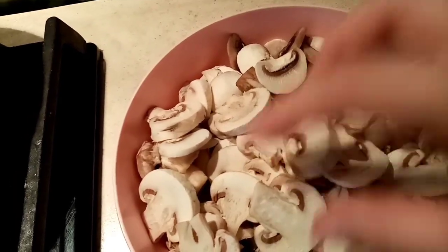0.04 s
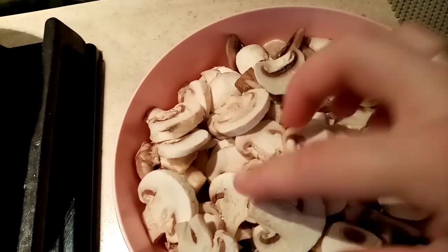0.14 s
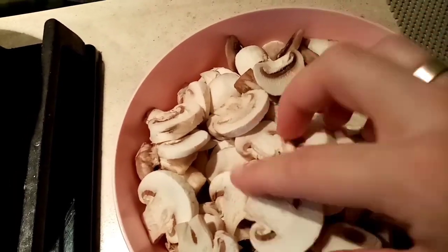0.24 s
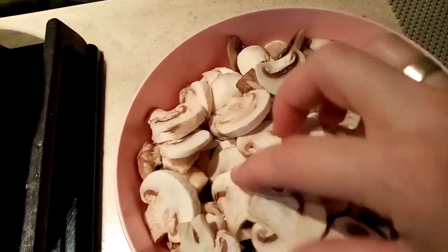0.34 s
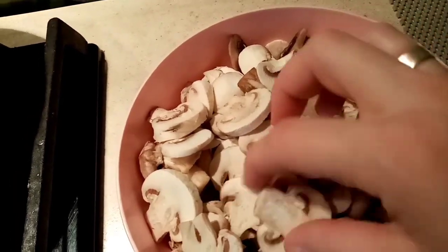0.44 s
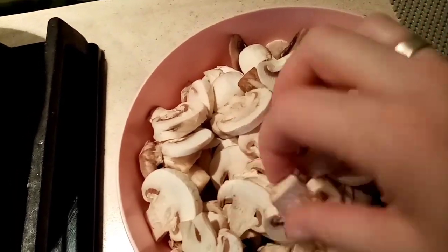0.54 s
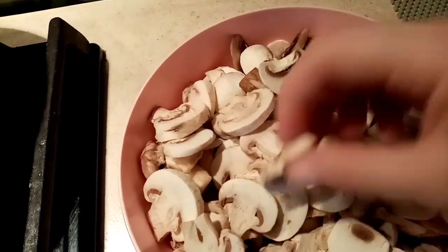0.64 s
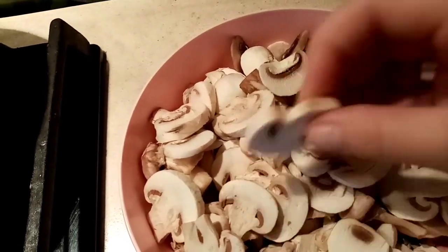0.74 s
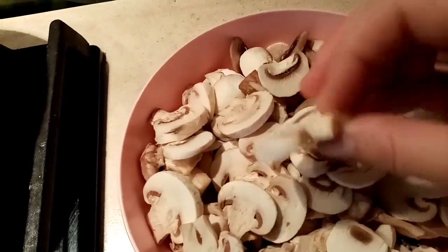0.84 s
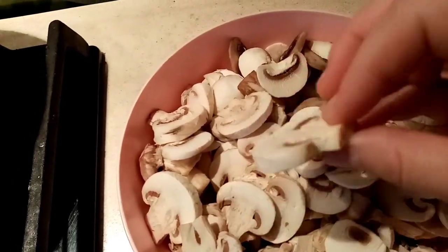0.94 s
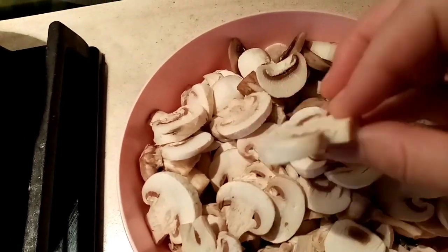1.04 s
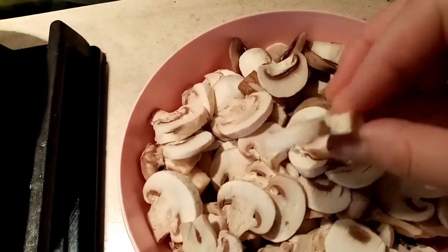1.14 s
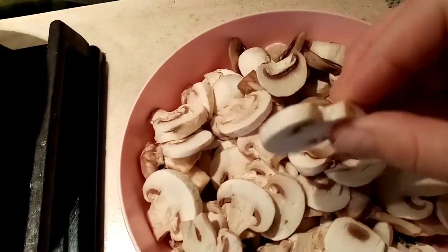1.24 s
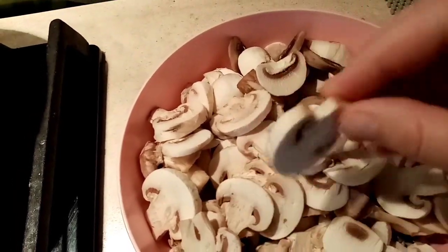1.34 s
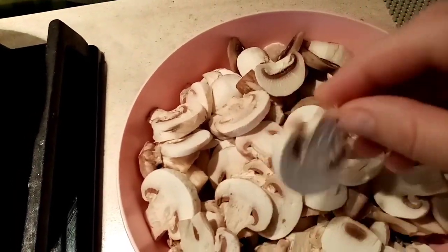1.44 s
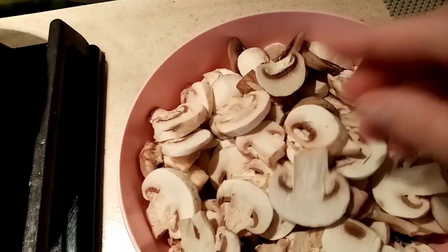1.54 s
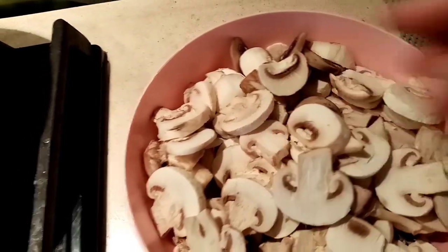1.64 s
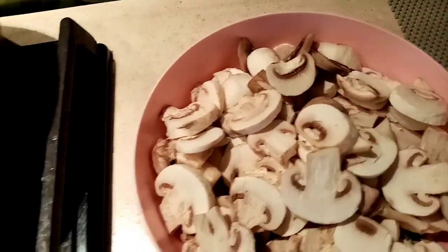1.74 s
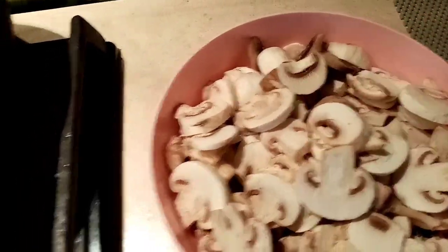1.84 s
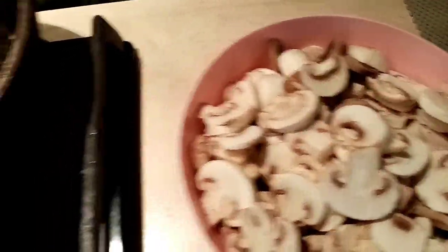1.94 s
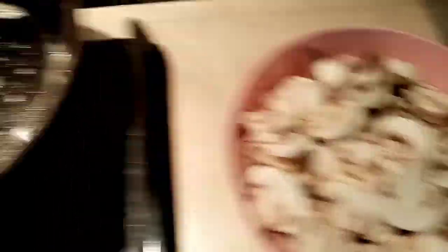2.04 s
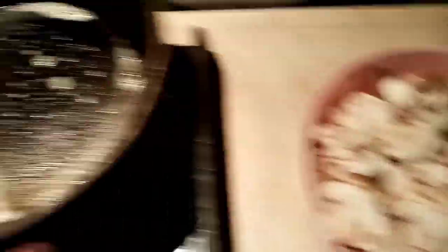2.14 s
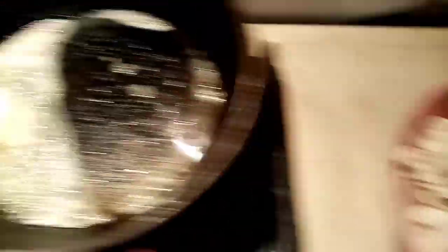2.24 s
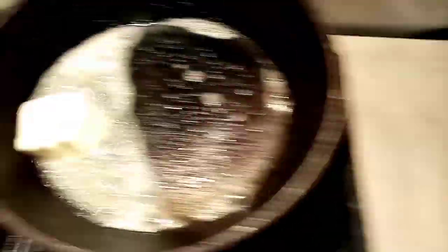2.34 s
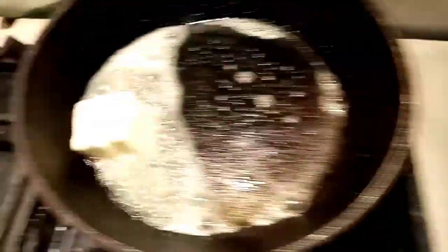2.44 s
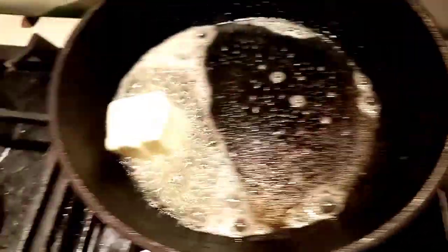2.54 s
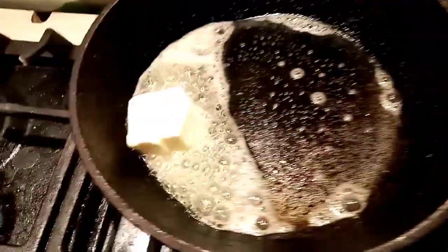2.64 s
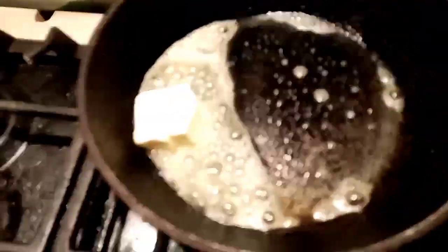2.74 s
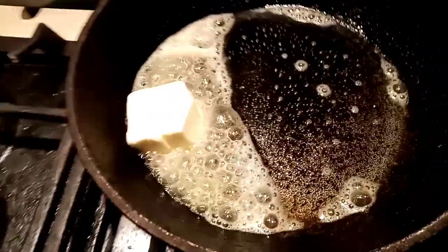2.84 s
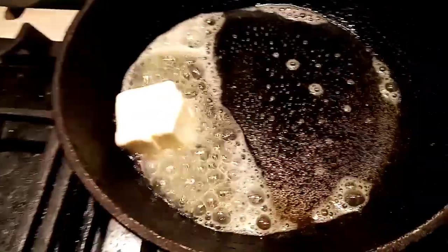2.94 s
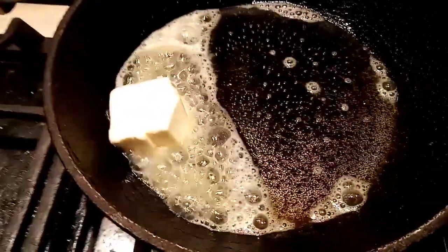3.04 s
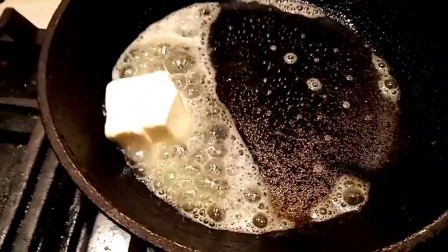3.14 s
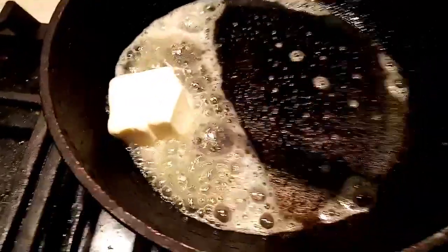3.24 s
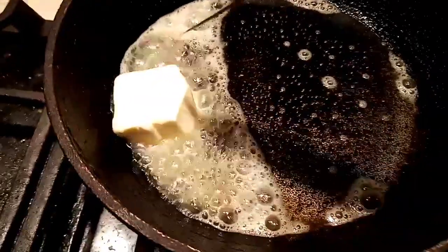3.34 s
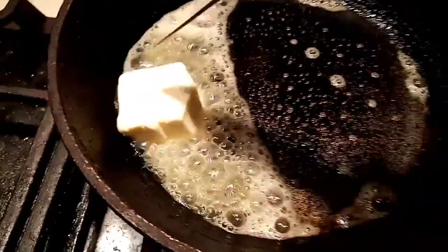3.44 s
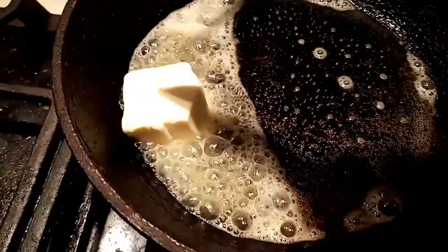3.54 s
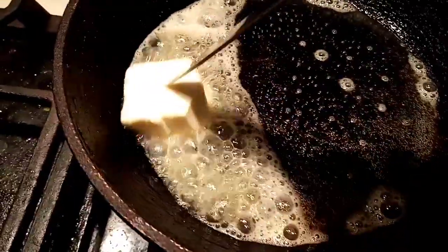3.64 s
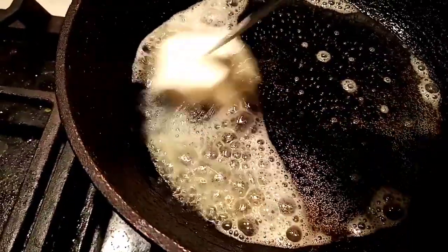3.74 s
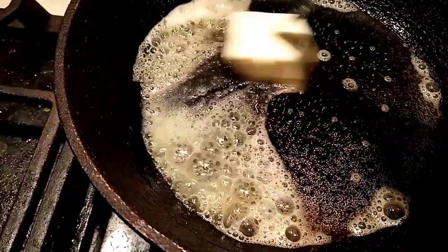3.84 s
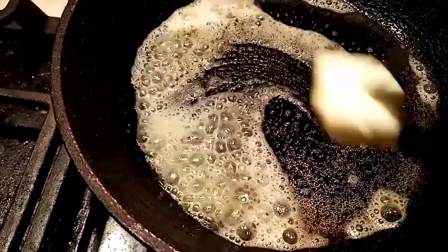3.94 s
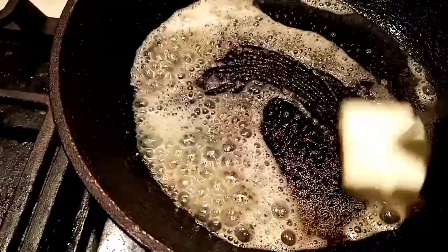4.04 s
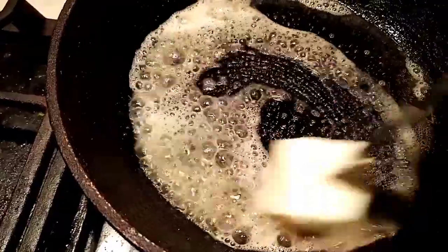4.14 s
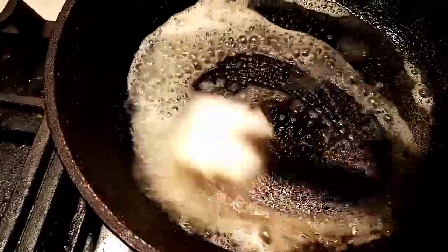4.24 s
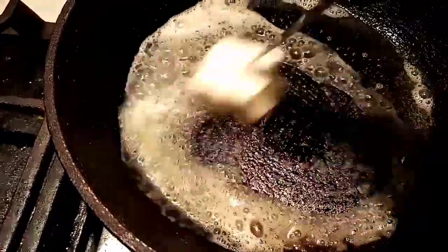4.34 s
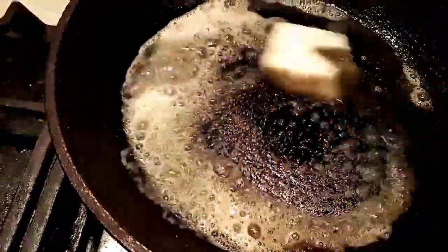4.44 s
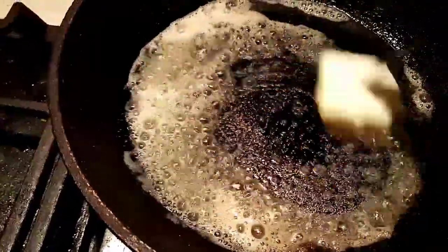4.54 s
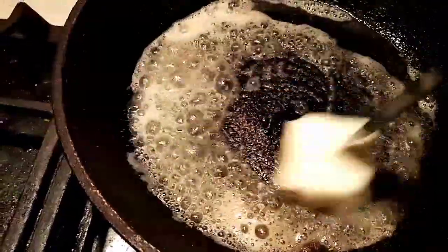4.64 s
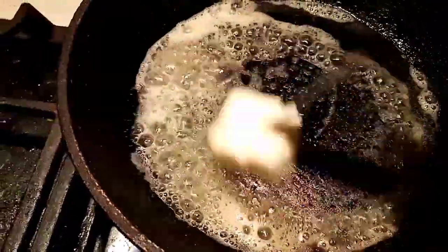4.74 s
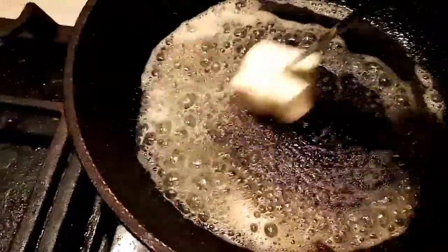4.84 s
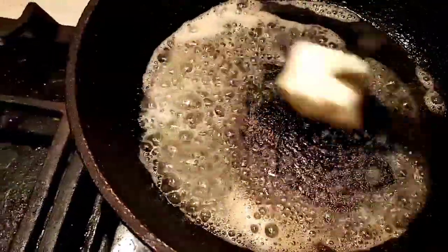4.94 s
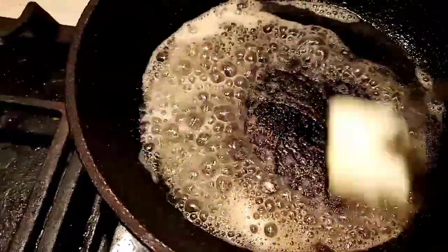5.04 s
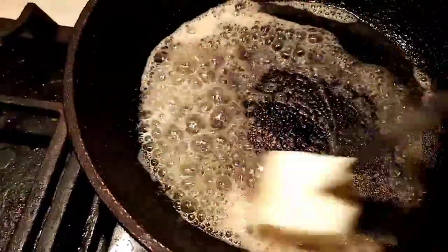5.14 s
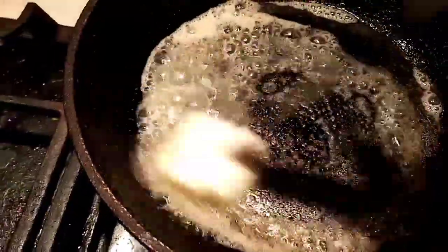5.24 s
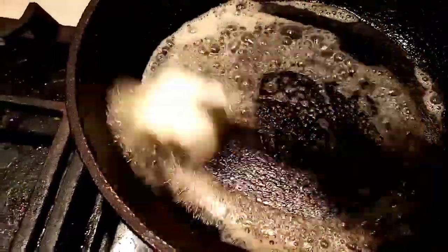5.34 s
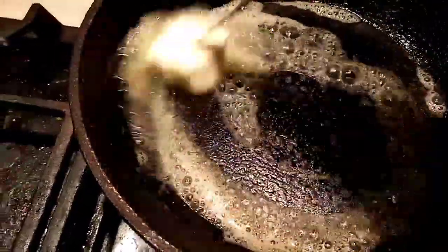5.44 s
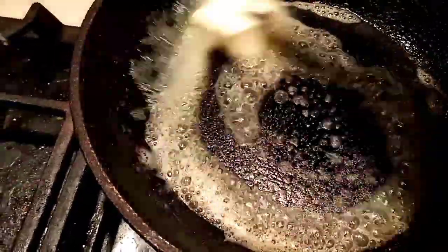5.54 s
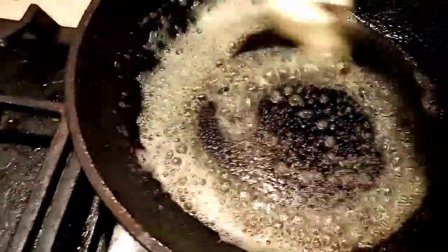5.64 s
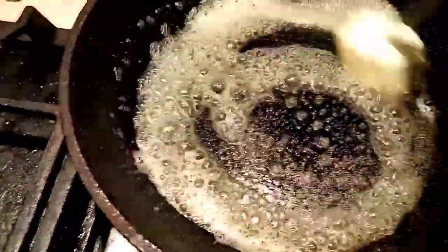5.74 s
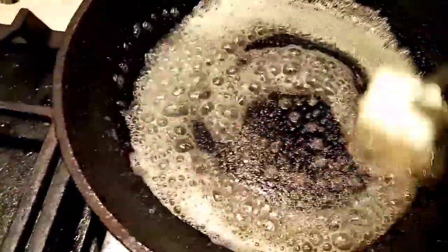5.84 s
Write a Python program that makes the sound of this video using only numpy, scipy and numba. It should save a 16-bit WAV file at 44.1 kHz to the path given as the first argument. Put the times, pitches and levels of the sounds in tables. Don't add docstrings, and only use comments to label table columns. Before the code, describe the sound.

Fine bright frying hiss full of crisp pops grows louder as the phone swings over the pan, with low bumps while butter is stirred.

```python
import sys
import numpy as np
from scipy import signal
from scipy.fft import rfft, irfft
from scipy.io import wavfile
from numba import njit

SR = 44100
rng = np.random.default_rng(int(sys.argv[2]) if len(sys.argv) > 2 else 0)


def output_pcm(signal):
    pcm = np.clip(np.atleast_2d(signal).T, -1, 1) * 32767
    wavfile.write(sys.argv[1], SR, np.round(pcm).astype(np.int16))


def voltage_ratio(decibels):
    exponent = np.asarray(decibels, float) / 20
    return 10 ** exponent


N = 260190

# frequency in Hz, level in dB.
BOOM_RESPONSE = [(25, -41), (60, -25), (85, -12), (112, -13), (124, -5), (134, 2), (146, -5), (160, -12),
                 (190, -11), (230, -40)]
# frequency in Hz, level in dB.
RATTLE_RESPONSE = [(150, -25), (205, -4.5), (243, 8), (280, -1.5), (319, 3), (400, -1.5), (520, -18.5),
                   (700, -3.5), (1100, -23), (1500, -16)]
# start in seconds, hold in seconds, boom in dB, rattle in dB.
BUMPS = [(0.433, .01, -78, -60), (0.465, .02, -64.5, -76), (1.387, 0.18, -67.5, -83),
         (1.618, 0.13, -70, -77.5), (2.19, 0.072, -70, -75), (2.444, 0.054, -67, -62),
         (2.54, 0.1, -65.5, -61), (2.81, 0.15, -65.5, -75), (3.11, 0.7, -71.5, -72.5),
         (3.622, 0.14, -63.5, -69), (4.028, 0.1, -62, -64.5), (4.145, 0.015, -63, -80),
         (4.347, 0.2, -67.5, -70.5), (4.788, 0.021, -63.5, -68), (5.104, 0.02, -48.5, -58.5),
         (5.278, 0.18, -62, -63.5), (5.515, 0.18, -58, -60.5), (5.746, 0.085, -55.5, -62)]
# start in seconds, peak in dB, pitch in Hz, ring length in cycles.
KNOCKS = [(0.416, -43, 336, 3.4), (0.416, -44, 920, 4.1), (.424, -46, 644, 5), (2.46, -50, 423, 10),
          (2.553, -53, 243, 16), (2.574, -40, 620, 15), (2.571, -54, 1070, 41), (2.445, -46, 614, 11),
          (2.46, -56, 770, 9.9), (2.597, -48.5, 430, 7.2), (3.581, -56.5, 80, 13), (4.037, -68, 144, 10),
          (5.071, -39, 300, 2.7), (5.081, -42, 138.7, 18.5), (5.289, -50, 131, 18), (5.671, -48, 95, 8.3)]
# time in seconds, phone over the pan from 0 to 1, stirring from 0 to 1.
HANDS = [
    (0, 0.12, 0.14),
    (1.2, 0.13, 0.31),
    (2.3, 0.5, 0.06),
    (2.55, 0.9, 0.38),
    (3.4, 1, 0.02),
    (3.85, 0.9, 0.52),
    (4.07, 0.84, 1),
    (5.1, 0.88, 0.83),
    (5.4, 0.6, 0.99),
    (5.9, 0, 0.95),
]
# time in seconds, delay of the right one in milliseconds.
RIGHT_DELAY = [(0, 1.32), (2.2, 1.3), (2.7, 1.12), (5.3, 1.14), (5.9, 0.88)]
# time in seconds, level in dB.
SIZZLE = [(0.0, -44), (0.93, -44.5), (2.45, -42.5), (2.58, -39.5), (3.01, -40.5), (3.17, -40), (3.62, -39),
          (3.78, -39.5), (4.14, -37), (4.6, -36.5), (4.81, -35), (5.13, -34.5), (5.27, -34.5), (5.42, -37),
          (5.9, -35)]
# frequency in Hz, left level in dB, right level in dB.
MICROPHONE_COLOUR = [(300, -35, -41.5), (466, -22, -30.5), (1240, -21.5, -15), (1976, -12.5, -12.5),
                     (1972, -15, -18), (2430, -11, -12.5), (4500, -2.5, -5), (6730, -1.5, -1),
                     (6980, -5, -2), (9180, -5, -6), (11140, -30, -16.5), (13350, -70, -18.5),
                     (15140, -56, -5.5), (16600, -27, 0.5)]
# frequency in Hz, width in Hz, level in dB.
PAN_MODES = [(782, 24, 0), (1035, 45, -1), (1523, 30, -4), (1790, 45, -3), (2000, 24, 2), (6650, 500, -11)]
# start in seconds, peak in dB, pitch in Hz, left minus right in dB, length in cycles.
PLOPS = [(1.474, -31, 1770, -4, 3.3), (1.478, -49.5, 700, -5, 2.9), (2.633, -32, 2150, -7, 3.2),
         (3.159, -44.5, 990, -3, 4), (3.715, -34, 1570, -12, 3.2), (4.208, -26.5, 1960, 7, 2.8),
         (4.216, -40, 1660, 6, 4.2), (4.269, -26, 2240, 1, 1.9), (5.3915, -26.5, 2400, -5, 8.1),
         (5.3965, -24, 2370, 0, 6.3), (5.3965, -23.5, 1710, -4, 4), (5.373, -30.5, 1800, -7, 4.5),
         (5.392, -32.5, 1660, -25, 4.3), (1.6235, -26.5, 3940, 4, 16), (1.6315, -33, 4000, -3, 11),
         (1.638, -31, 4300, -3, 11), (1.65, -37, 3900, -3, 14)]
# start in seconds, peak in dB.
TICKS = [(0.018, -32), (3.4705, -41), (3.635, -31), (4.0881, -42), (4.4204, -37), (4.7096, -26),
         (4.842, -34), (5.1965, -35), (5.5032, -22), (5.613, -24), (5.8321, -29), (5.8825, -38)]
# start in seconds, peak in dB, pitch in Hz, left minus right in dB.
SPITS_AWAY = [(0.069, -27, 6200, 5), (0.1412, -34, 6420, 8), (0.2035, -35.5, 3700, -1),
              (0.3066, -33.5, 3500, 1), (0.377, -36, 4320, 1), (0.3956, -33, 4400, 0),
              (0.4411, -33, 6500, 2), (0.4608, -27, 6400, 3), (0.5328, -32, 6420, -11),
              (0.6856, -43, 5730, 0), (0.7597, -33, 7360, 2), (0.9065, -32, 6960, 6),
              (1.1198, -26.5, 6500, 2), (1.1902, -40, 6120, 6), (1.1986, -42, 6590, 4),
              (1.2853, -27.5, 6120, 5), (1.3051, -26, 8050, -1), (1.3907, -34, 6400, 3),
              (1.4069, -28, 6290, 5), (1.4624, -28, 4050, -1), (1.543, -27, 6360, -5),
              (1.5481, -28, 5680, 4), (1.5722, -28, 6700, 1), (1.6241, -22, 4430, 0),
              (1.627, -36, 4340, -11), (1.6318, -35, 4150, -12), (1.6534, -39, 5770, 2),
              (1.7039, -30, 8400, 1), (1.7289, -36, 4000, 7), (1.7414, -31, 4820, 2),
              (1.8149, -36, 6370, -5), (1.8323, -31, 6550, -7), (1.9095, -27, 6760, -1),
              (1.9127, -21, 6450, -5), (1.9802, -32, 6200, 4), (2.0444, -37, 6980, 7),
              (2.0761, -35, 6500, 9), (2.0914, -21.5, 5440, 1), (2.0951, -28, 4600, -7),
              (2.1485, -27.5, 4200, 0), (2.1587, -28, 7020, 3), (2.1928, -32, 8200, -5),
              (2.2628, -34, 5700, 2), (2.2661, -30.5, 6540, 3), (2.2958, -41, 6860, 2),
              (2.3555, -21, 5470, -2), (2.3598, -35, 6680, -1), (2.3854, -26, 5670, -4),
              (2.3942, -26, 5400, 1), (2.4199, -30, 6070, -5)]
# start in seconds, peak in dB, pitch in Hz, left minus right in dB.
SPITS_OVER = [(2.498, -27, 6240, 2), (2.507, -21, 6940, 5), (2.509, -28, 6500, 1), (2.552, -24.5, 6700, -5),
              (2.5587, -30, 5340, -5), (2.5928, -33, 6590, -10), (2.6356, -13, 5220, -3),
              (2.6473, -29, 6640, -13), (2.682, -21.5, 5500, 1), (2.702, -26, 7300, -8),
              (2.7046, -22.5, 6900, -13), (2.7283, -24, 7300, -12), (2.736, -22, 6630, -10),
              (2.7407, -28, 7700, -6), (2.7433, -28, 6420, -6), (2.7562, -21, 6680, -7),
              (2.8116, -41, 6500, -9), (2.8555, -32, 7110, 1), (2.8764, -30.5, 9000, -13),
              (2.894, -39, 6370, -4), (2.9072, -39, 7540, 0), (2.9307, -24, 7100, 4),
              (2.9384, -31, 8200, -13), (2.9676, -29, 8450, -5), (2.986, -30, 7800, -14),
              (3.057, -16, 5600, 0), (3.0596, -26, 6000, -7), (3.0911, -25, 8050, 0),
              (3.0958, -18, 7460, -5), (3.1607, -25, 6150, 4), (3.1826, -22.5, 8400, -2),
              (3.1913, -21.5, 6100, 1), (3.2171, -22, 7150, 0), (3.234, -25, 5430, -9),
              (3.2405, -23.5, 6560, -10), (3.254, -26, 7900, 1), (3.2943, -27, 6290, -8),
              (3.3084, -28, 6840, -7), (3.3237, -30, 3670, -5), (3.3813, -26, 6550, -2),
              (3.4044, -34.5, 3670, 0), (3.4378, -29, 6070, 2), (3.4803, -25, 6590, -2),
              (3.4957, -24.5, 4100, -2), (3.5142, -18, 6540, -2), (3.5512, -24, 4740, 1),
              (3.5597, -30, 5600, -6), (3.623, -33, 5700, 0), (3.679, -31, 6550, -14),
              (3.7115, -27.5, 5740, -1)]
# start in seconds, peak in dB, pitch in Hz, left minus right in dB.
SPITS_STIRRED = [(3.7716, -25.5, 3730, -2), (3.7747, -20.5, 6200, 0), (3.7973, -23, 3620, -4),
                 (3.808, -22, 5370, -2), (3.819, -28, 4610, 3), (3.831, -24.5, 6420, -3),
                 (3.8498, -32, 5900, 8), (3.8705, -31, 5550, 3), (3.8779, -23, 5560, 0),
                 (3.8948, -29, 8270, -4), (3.9181, -20.5, 6940, -1), (3.928, -33, 5380, 7),
                 (3.9392, -20, 5730, 3), (3.9836, -17.5, 5800, 0), (3.9985, -18, 7300, -8),
                 (4.0166, -24, 7150, 3), (4.0435, -27, 7800, 1), (4.0488, -25, 6200, 5),
                 (4.0533, -28, 7190, -2), (4.0965, -31, 6070, 0), (4.1046, -25, 6240, 3),
                 (4.1071, -27, 6070, 3), (4.1273, -16, 6300, -3), (4.1688, -17.5, 6100, 0),
                 (4.19, -18.5, 3940, -4), (4.203, -15, 7000, -2), (4.2159, -14, 6230, -6),
                 (4.2357, -19, 8400, -7), (4.2439, -17, 7490, -5), (4.268, -18, 5340, 2),
                 (4.2865, -15, 5900, -2), (4.3006, -23, 6230, -7), (4.3413, -23, 6300, -4),
                 (4.348, -21, 6570, -6), (4.3733, -21, 5990, 3), (4.3821, -26, 7540, -11),
                 (4.4363, -32, 7280, -1), (4.4654, -24, 6850, -2), (4.471, -34, 6720, -3),
                 (4.5003, -33, 6590, -2), (4.514, -24, 8760, -1), (4.5564, -18, 6600, 0),
                 (4.5622, -26, 6100, 1), (4.581, -25, 6800, 10), (4.592, -25, 6500, 3),
                 (4.6252, -22, 6460, -5), (4.6317, -19, 6550, -4), (4.6419, -18, 6400, 3),
                 (4.6513, -16.5, 8000, -6), (4.685, -18.5, 6500, -1)]
# start in seconds, peak in dB, pitch in Hz, left minus right in dB.
SPITS_RIM = [(4.7298, -18, 5730, -9), (4.734, -19, 4910, 4), (4.768, -19, 5430, 6), (4.7835, -24, 6400, 4),
             (4.809, -22, 8000, -10), (4.8128, -15.5, 6290, -1), (4.8217, -18.5, 5680, -2),
             (4.8409, -22, 5380, -1), (4.879, -22, 6290, -10), (4.8822, -19, 7020, -12),
             (4.8865, -12.5, 8400, -10), (4.91, -25, 6420, -1), (4.9373, -18, 5350, 0),
             (4.9473, -17.5, 7350, -9), (4.9636, -21, 7410, -11), (4.9864, -16.5, 6350, 0),
             (5.0115, -24, 8310, -6), (5.0216, -20, 5860, 3), (5.0343, -25, 6930, -5),
             (5.0379, -23, 6630, -1), (5.067, -27, 6070, 5), (5.1117, -23, 8600, 2), (5.13, -22, 8500, -4),
             (5.1432, -23, 5680, 1), (5.166, -21, 6700, 7), (5.1894, -23, 6030, 3),
             (5.2307, -20, 6940, -10), (5.2385, -15, 6350, -4), (5.2627, -17, 6260, 0),
             (5.2737, -25, 8300, -2), (5.2874, -19.5, 6460, -11), (5.2963, -29, 8200, -7),
             (5.2995, -26, 6460, -7), (5.3586, -29, 6200, -8), (5.3608, -32, 7060, -5),
             (5.4796, -21.5, 7280, -13), (5.519, -20.5, 6700, -16), (5.5787, -26, 7920, -10),
             (5.586, -26, 6330, -9), (5.596, -26, 5940, 5), (5.602, -24, 6850, -6), (5.6033, -31, 6290, -3),
             (5.6274, -28, 6460, -2), (5.634, -19.5, 8600, -6), (5.6547, -27, 5560, -7),
             (5.714, -18, 6340, -9), (5.7587, -27, 5860, -4), (5.8004, -21, 8000, -2),
             (5.8257, -23, 6300, -5), (5.8827, -35, 5470, -1)]


def curve(table, s):
    rows = np.array(table, float)
    return [np.interp(s, rows[:, 0], column) for column in rows[:, 1:].T]


def unit(x):
    return x / np.sqrt(np.mean(x ** 2))


def walk(rate, s):
    steps = rng.standard_normal(200 * 6)
    return np.interp(s * rate, np.arange(len(steps)), steps)


def colour(x, hz, db):
    size = 8192
    log_hz = np.log(np.arange(size // 2 + 1) * SR / size + 1)
    cepstrum = irfft(np.interp(log_hz, np.log(hz), db) * np.log(10) / 20)
    cepstrum[1:size // 2] *= 2
    cepstrum[size // 2 + 1:] = 0
    response = irfft(np.exp(rfft(cepstrum)))
    return signal.fftconvolve(x, response)[:N]


@njit
def rings(start, hz, cycles, size, glide, swell, count):
    out = np.zeros(count)
    for g in range(len(start)):
        first = int(np.ceil(start[g]))
        turn = hz[g] / SR
        for k in range(first, min(count, first + int(1.8 * cycles[g] / turn) + 2)):
            c = (k - start[g]) * turn
            shape = (1 - np.exp(-(c / swell) ** 2)) * np.exp(-3 * c / cycles[g])
            out[k] += size[g] * shape * np.sin(2 * np.pi * c * (1 + glide * c / cycles[g]))
    return out


def shake(t):
    attack_db_s, release_db_s = 500, 178
    s, hold, *peaks_db = np.transpose(BUMPS)[:, :, None]
    rise_db = attack_db_s * np.clip(s - t, 0, 1)
    decay_db = release_db_s * np.clip(t - s - np.abs(hold), 0, 1)
    fall_db = rise_db + decay_db
    stir = curve(HANDS, t)[1]
    rests_db = (-77, -80 + 6 * stir)
    return [np.maximum((peak - fall_db).max(axis=0), rest) + 2.5 * walk(14, t)
            for peak, rest in zip(peaks_db, rests_db)]


def stove():
    boom_db, rattle_db = shake(np.arange(N) / SR)
    shared, own = rng.standard_normal((2, N)), rng.standard_normal((2, 2, N))
    boom = np.array([colour(shared[0] + 0.5 * x, *np.transpose(BOOM_RESPONSE)) for x in own[0]])
    rattle = np.array([colour(shared[1] + 1.4 * x, *np.transpose(RATTLE_RESPONSE)) for x in own[1]])
    s, db, hz, cycles = np.transpose(KNOCKS)
    knock = rings(s * SR, hz, np.clip(cycles, 1, 30), voltage_ratio(db + 2.5), 0., 0.49, N)
    left, right = unit(boom) * voltage_ratio(boom_db) + unit(rattle) * voltage_ratio(rattle_db + 1.5) + knock
    return np.array([voltage_ratio(-1.8) * left, voltage_ratio(2.44) * np.roll(right, 36)])


def swing(s):
    over, stir = curve(HANDS, s)
    deep_db = -9 + 6 * over + 9 * stir
    low_db = 4 - 5 * over - 6.5 * stir
    fine_db = -3.5 * over + 8.5 * stir
    pan_db = -2.5 * over - 2 * stir
    return deep_db, low_db, fine_db, pan_db


def both_ears(s, hz, cycles, db, pan_db, place_ms, glide):
    late = np.clip(s + (curve(RIGHT_DELAY, s)[0] + place_ms) / 1000, 0, None)
    cycles = np.clip(cycles, 1, 20)
    return [rings(t * SR, hz, cycles, voltage_ratio(db + side * pan_db / 2), glide, 0.95, N)
            for t, side in ((s, 1), (late, -1))]


def pan_echo(s, hz, cycles, db, pan_db, place_ms, glide, wall_db, wall_s, room_db, room_s):
    t = np.arange(SR // 4) / SR
    wall = voltage_ratio(wall_db - 60 * t / wall_s) * (t > 0.0006)
    room = voltage_ratio(room_db - 60 * t / room_s) * (t > 0.004)
    bursts = (s, hz, cycles, db, pan_db, place_ms)
    out = np.zeros((2, N))
    places = 6
    for k in range(places):
        pair = both_ears(*(v[k::places] for v in bursts), glide)
        echo = (wall + room) * rng.standard_normal((2, len(t)))
        echo[:, 0] = 1
        out += signal.oaconvolve(np.array(pair), echo, axes=1)[:, :N]
    return out


def iron(pair, deep_db):
    ring = sum(voltage_ratio(db) * signal.lfilter(*signal.iirpeak(hz, hz / width, fs=SR), pair)
               for hz, width, db in PAN_MODES)
    pair = pair + ring
    band = signal.butter(4, [660, 1350], "band", fs=SR, output="sos")
    deep = signal.sosfiltfilt(band, pair)
    return pair + (voltage_ratio(deep_db) - 1) * deep


def foam():
    count = 6 * 9000
    even, bell = rng.random((count, 3)).T, rng.standard_normal((count, 3)).T
    s = even[0] * N / SR
    hz = 400 * 40 ** (even[1] ** 0.6363)
    _, low_db, fine_db, pan_db = swing(s)
    low_share = np.clip(np.log2(3500 / hz) / 1.14, 0, 1)
    fine_share = np.clip(np.log2(hz / 8500) / 0.13, 0, 1)
    tilt_db = low_db * low_share + fine_db * fine_share
    patch = s + np.floor(3 * even[1]) / 30
    flurry_db = 0.3 * walk(9, s) + 1.5 * walk(70, patch) + 1.5 * walk(190, s)
    size_db = np.minimum(-3.6 * np.log(even[2] + 1e-5), 15)
    db = size_db + flurry_db + tilt_db + 2.32 * np.log2(hz / 6000)
    cycles = 3.8 * (hz / 6000) ** 0.3 * np.exp(0.4 * bell[0])
    pair = pan_echo(s, hz, cycles, db, pan_db + 4 * bell[1], 0.069 * bell[2], glide=0.12,
                    wall_db=-20, wall_s=0.028, room_db=-34, room_s=0.4)
    colour_hz, *ears_db = np.transpose(MICROPHONE_COLOUR)
    pair = np.array([colour(x, colour_hz, ear_db) for x, ear_db in zip(pair, ears_db)])
    t = np.arange(N) / SR
    pair = iron(pair, swing(t)[0])
    return unit(pair) * voltage_ratio(curve(SIZZLE, t)[0] + 1.5)


def stray_spits(usual_cycles):
    count = 6 * 5
    bell = rng.standard_normal((count, 4)).T
    s = rng.random(count) * N / SR
    db = curve(SIZZLE, s)[0] + 11.5 + 0.84 * bell[0]
    hz = 6500 * np.exp(np.clip(0.096 * bell[1], -0.2, 0.3))
    pan_db = swing(s)[3] - 2.5 + 5 * bell[2]
    return s, db, hz, pan_db, usual_cycles * np.exp(0.28 * bell[3])


def port_ticks():
    s, db = np.transpose(TICKS)
    return s, db, 14900 + 0 * s, -22 + 0 * s, 9.5 + 0 * s


def blade_slips():
    even = rng.random((30, 3)).T
    s = 5.372 + 0.062 * even[0]
    hz = 1900 * 2 ** (0.66 * (even[2] - 0.5))
    return s, -46 + 6 * even[1], hz, -3 + 0 * s, 3 + 0 * s


def spit_rows():
    s, db, hz, pan_db = np.concatenate([SPITS_AWAY, SPITS_OVER, SPITS_STIRRED, SPITS_RIM]).T
    usual_cycles = 5.5
    loud = (s, db + 2.5, hz, pan_db, usual_cycles * (hz / 6000) ** -0.35)
    groups = [loud, np.transpose(PLOPS), port_ticks(), stray_spits(usual_cycles), blade_slips()]
    return np.concatenate(groups, axis=1)


def spits():
    s, db, hz, pan_db, cycles = spit_rows()
    place_ms = 0.027 * rng.standard_normal(len(s))
    snap_hz = np.minimum(0.756 * hz, 5200)
    snap_db = db - 4 - 25 * (hz > 12000) - 8 * (hz < 3000)
    snap = (s, snap_hz, 3 + 0 * s, snap_db, pan_db, place_ms)
    ring = (s, hz, 1.273 * cycles, db + 4.5, pan_db, place_ms)
    both = (np.concatenate([a, b]) for a, b in zip(ring, snap))
    return pan_echo(*both, glide=0.04, wall_db=-21, wall_s=0.02, room_db=-41, room_s=0.3)


def scene():
    return stove() + foam() + spits()


def band_limit(x):
    return signal.sosfilt(signal.butter(12, 16890, fs=SR, output="sos"), x)


def record(dry):
    low_pass = signal.ellip(14, 0.5, 70, 15490, fs=SR, output="sos")
    mix = signal.sosfilt(low_pass, dry)
    return band_limit(mix)


dry = scene()
out = record(dry)
output_pcm(out)
```